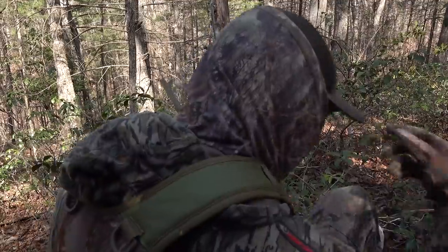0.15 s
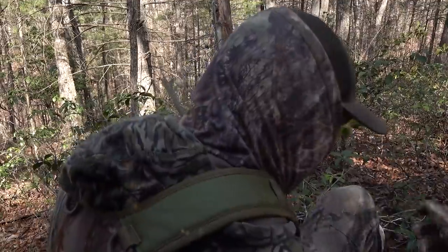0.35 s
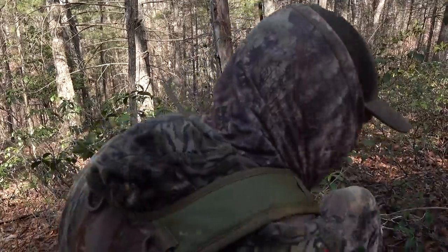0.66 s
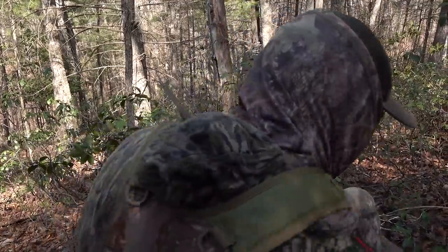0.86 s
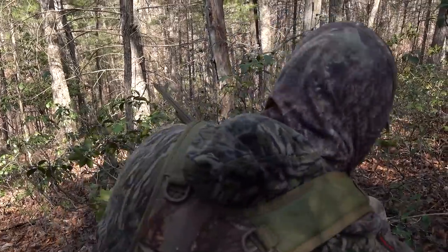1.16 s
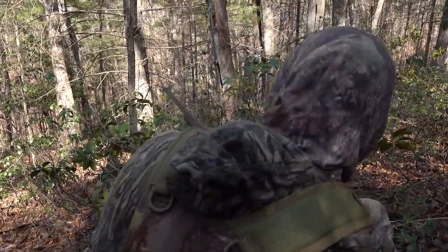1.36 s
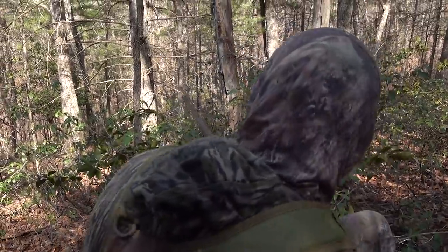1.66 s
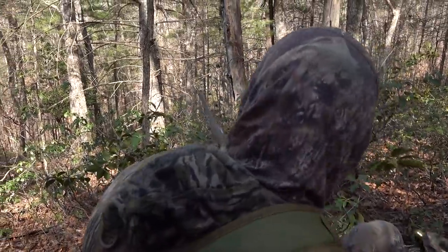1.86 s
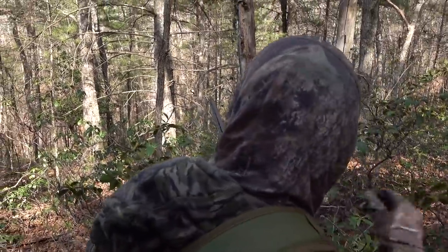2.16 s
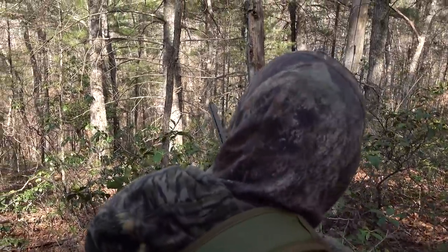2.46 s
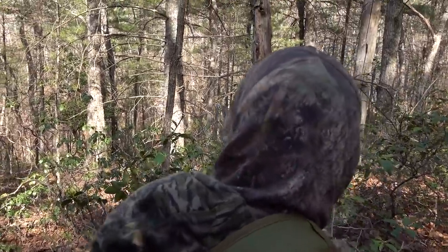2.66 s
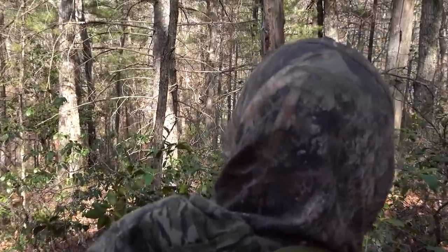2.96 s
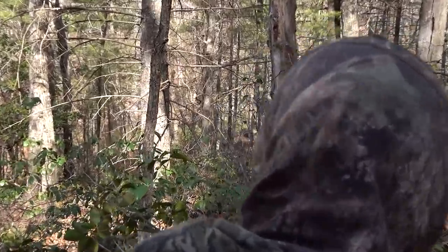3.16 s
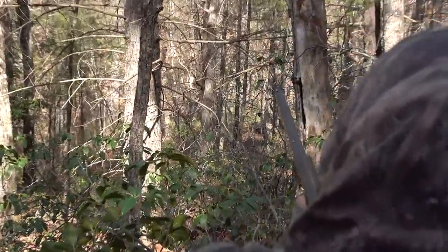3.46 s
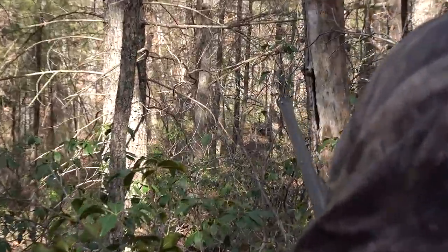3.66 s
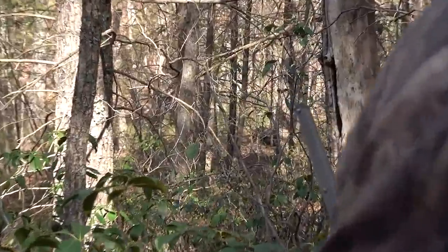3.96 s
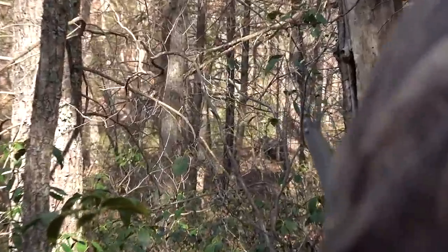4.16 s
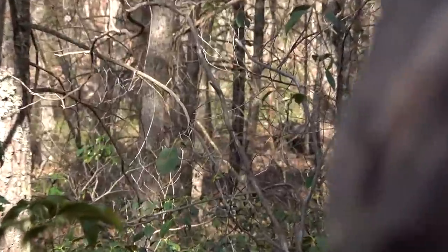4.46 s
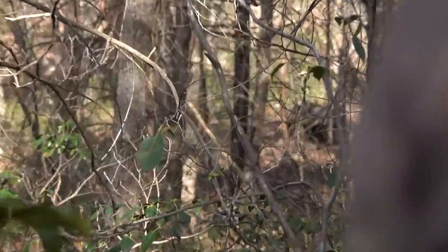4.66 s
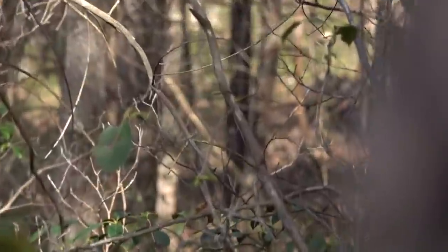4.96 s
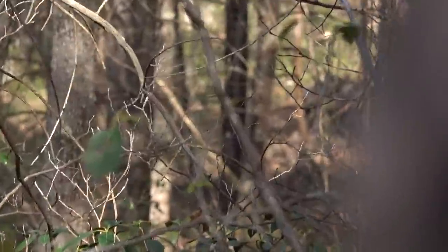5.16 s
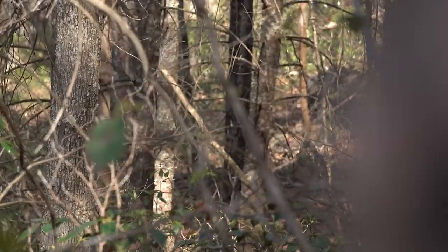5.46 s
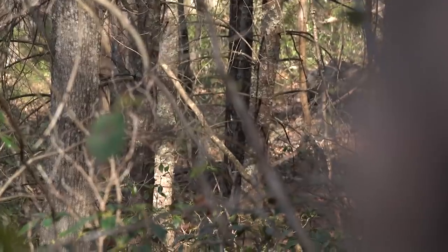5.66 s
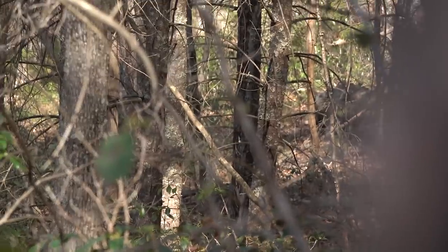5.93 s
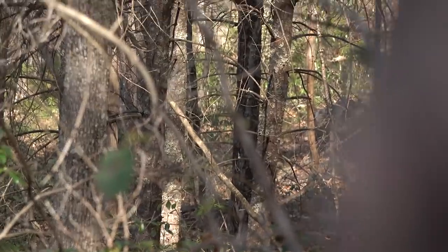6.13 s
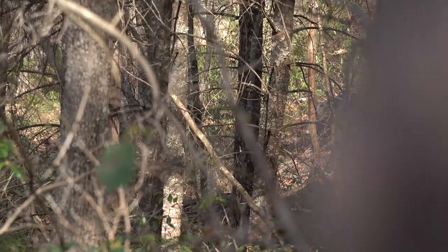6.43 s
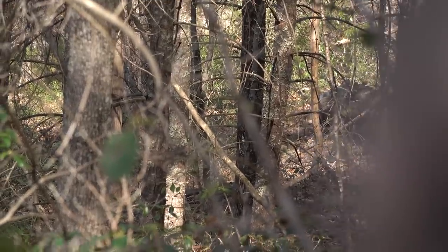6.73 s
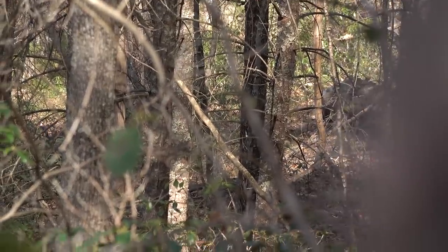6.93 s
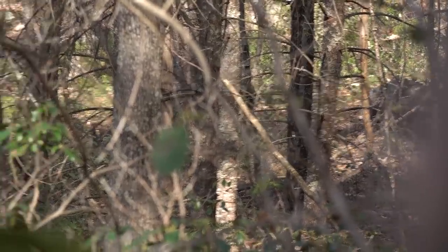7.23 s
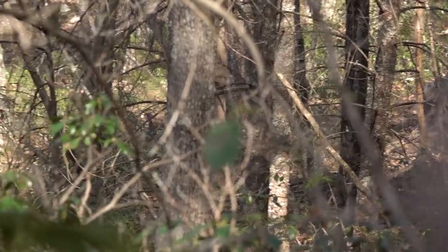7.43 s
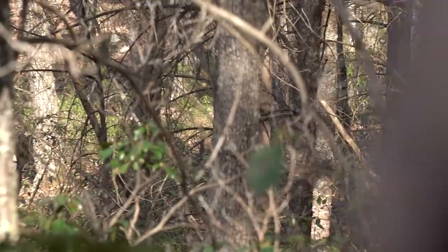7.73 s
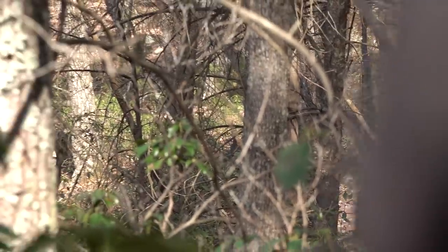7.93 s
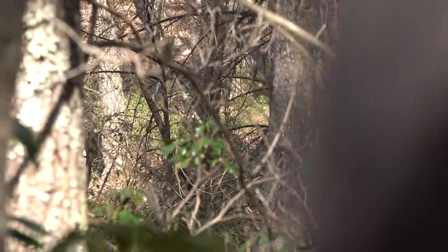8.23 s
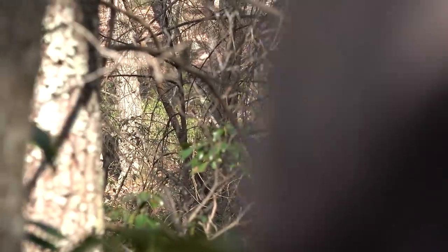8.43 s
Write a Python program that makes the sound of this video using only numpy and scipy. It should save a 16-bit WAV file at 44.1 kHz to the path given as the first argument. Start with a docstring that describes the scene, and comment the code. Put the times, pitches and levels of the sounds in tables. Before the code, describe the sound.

Very close to the microphones, clothes rub and dry leaves hiss. A sharp turkey cluck comes first, then a brief whine sliding upward. After more rustling and faint songbird chips, thirteen buzzing, raspy yelps follow in an even run, with a harsh gritty crunch near the end. Two abrupt clucks close it. A thin woodland echo trails the overloaded, wide stereo sound.

```python
"""Turkey yelps at close range in a wood: a sharp cluck, a rising whine, a run of thirteen yelps, two more clucks.
Clothes and dry leaves rustle and snap, one loud crunch echoes among the trees, a small bird chips far off.
Calls are buzzing partials shaped by a throat spectrum; rustle, snaps and crunch are shaped noise;
chips, drone and knock are sines; the echo is a convolution with decaying noise.
Two clip-on microphones, one a side, each overload into their own limiter; the right one arrives late."""
import sys
import numpy as np
from scipy import signal
from scipy.fft import rfft, irfft, next_fast_len
from scipy.io import wavfile
from scipy.ndimage import map_coordinates

SR = 44100
rng = np.random.default_rng(int(sys.argv[2]) if len(sys.argv) > 2 else 0)


def unload_wav(signal):
    """Save mono or channel-first audio to the path in sys.argv[1] as 16-bit WAV at rate SR, clipped to [-1, 1]."""
    wavfile.write(
        sys.argv[1],
        SR,
        np.round(np.clip(np.atleast_2d(signal).T, -1, 1) * 32767).astype(np.int16),
    )


N = 378819
TIME_S = np.arange(N) / SR

# Yelps. Each row: start in seconds, loud part in seconds, soft tail in seconds, held pitch in Hz,
# left level in dB, right level in dB, seconds until the note breaks, rasp after the break from 0 to 1.
YELPS = [(3.136, 0.046, 0.063, 669.5, -2.5, -5.5, 0.081, 0.1),
         (3.472, 0.078, 0.014, 643.5, -1, 2.5, 0.058, 0.15),
         (3.806, 0.061, 0.041, 681.6, 0.5, 5, 0.053, 0.24),
         (4.115, 0.064, 0.027, 673.7, 0.5, 3.5, 0.038, 0.5),
         (4.449, 0.065, 0.012, 633, -0.5, 4.5, 0.041, 1), (4.778, 0.053, 0.027, 651, -0.5, 3, 0.045, 0.6),
         (5.114, 0.074, 0.023, 692.5, -0.5, 2, 0.044, 0.51),
         (5.452, 0.086, 0.021, 712.7, 0.5, 2, 0.042, 0.97),
         (5.803, 0.0796, 0.017, 674.7, 1, 1, 0.048, 0.56),
         (6.162, 0.058, 0.025, 700.2, -0.5, 4.5, 0.051, 0.74),
         (6.510, 0.064, 0.017, 701.6, 0.5, 3.5, 0.055, 0.68),
         (6.856, 0.047, 0.053, 732, 1, 2.5, 0.033, 0.95), (7.212, 0.068, 0.016, 684, -1, -8, 0.046, 0.41)]
# Clucks. Each row: start in seconds, length in seconds, first pitch in Hz, last pitch in Hz,
# left level in dB, right level in dB, rasp from 0 to 1.
CLUCKS = [(0.129, 0.0378, 525, 790, 1, 4.5, 0.95), (8.224, 0.032, 556.6, 892, 4, 7, 0.9),
          (8.559, 0.035, 516, 844, 0, 13, 0.83)]
# Curve of the whine. Each row: time in seconds, mean pitch in Hz, left level in dB, right level in dB.
WHINE = [(1.06, 530, -30, -38), (1.095, 542.6, -13, -24), (1.14, 592.5, -15, -13), (1.17, 712, -12, -18),
         (1.187, 886, 3.5, 2.5), (1.204, 1164, -8, -5), (1.212, 1200, -42.5, -20)]
# Throat resonances that shape the calls. Each row: frequency in Hz, gain in dB.
THROAT = [(200, -47), (400, -37.5), (690, -29.5), (790, -26), (930, -8.5), (1150, -2), (1350, -0.5),
          (1520, -5), (1700, -11.5), (2100, -20.5), (2800, -42), (3700, -28.5), (4300, -38.5),
          (7000, -51.5), (12000, -61.5)]
# Curve of the loud crunch. Each row: time in seconds, left level in dB, right level in dB.
CRUNCH = [(6.884, -45, -12), (6.893, -27, 5), (6.91, -5, 10.5), (6.917, -28, 9), (6.923, -5, 9),
          (6.935, -39, 12), (6.944, 6, 11), (6.957, 9, 25.5), (6.965, -21, 9.5), (6.985, -55, -10)]
# Spectrum of the crunch. Each row: frequency in Hz, density in dB per Hz.
CRUNCH_SPECTRUM = [(30, -42), (300, -16.5), (900, -5), (2500, -8), (5000, -12), (9000, -10.5),
                   (15500, -15.5)]
# Snaps and scuffs of twigs and cloth. Each row: start in seconds, decay constant in seconds,
# left level in dB, right level in dB (both before SNAP_GAIN_DB), low-pass cutoff in Hz.
SNAPS = [(.155, 0.0091, -29, -3.5, 9000), (.214, 0.005, -28, -8.5, 11600), (.937, 0.0014, -33, -8.5, 14000),
         (.957, 0.0033, -32, -15, 14000), (.978, 0.0033, -31, -13, 12000), (1.096, 0.00335, -14, -25, 2000),
         (2.251, 0.0025, -20, -19, 7000), (2.333, 0.0034, -16, -40, 7050),
         (2.389, 0.0015, -13, -12.5, 5700), (2.720, 0.0047, -21, -12.5, 3760),
         (2.784, 0.0033, -26, -11, 12000), (3.097, 0.0029, -10, -3, 5500), (3.117, 0.003, -7, -21, 1450),
         (3.126, 0.0018, 2, 5.5, 3000), (3.896, 0.0029, -42, -21, 7840), (3.995, 0.0014, -36.5, -10, 2420),
         (4.013, 0.0034, -7, -5, 1900), (4.042, 0.0023, -37, -32, 7000), (4.062, 0.0052, -14, -11.5, 2480),
         (4.599, .003, -36, -23, 10000), (4.678, 0.0021, -39, -10.5, 15100),
         (4.902, 0.0029, -32, -20.5, 10140), (5.088, 0.0015, -5, -0.5, 3900),
         (5.229, 0.0041, -46, -19.5, 12900), (5.348, 0.0013, -34, -14, 12100),
         (5.824, 0.0028, -29, -0.5, 12000), (5.909, 0.0057, -8.5, 3.5, 3520),
         (5.930, 0.0052, -30, -2, 7800), (5.944, 0.0064, -23, -22, 8000), (6.846, 0.0025, -37, -8.5, 7000),
         (6.860, 0.0025, -18, -5.5, 7750)]
# Swishes of cloth and leaves, one a movement, and long faint fidgeting. Each row: start in seconds,
# length in seconds, rub level in dB, hiss level in dB (before HISS_GAIN_DB), left minus right in dB.
SWISHES = [(0.0, 0.16, -26.5, -27.5, -4), (0.128, 0.15, -26.5, -31, -4.5), (0.602, 0.14, -33, -43, 2.5),
           (0.714, 0.28, -27.5, -38.5, -1), (0.59, 11, -43, -52, -4.5), (0.985, 0.18, -23, -30.5, -0.5),
           (1.181, 0.52, -32, -32.5, 2.5), (1.697, 0.39, -32.5, -46, 0.5), (2.185, 0.29, -35.5, -38, -3.5),
           (2.564, 0.42, -31, -42.5, -9), (2.714, 2.3, -39, -59.5, -11.5), (3.039, 0.13, -26.5, -37.5, -8),
           (3.31, 0.24, -36, -43.5, -8.5), (3.716, 0.22, -34, -49, -5), (3.95, 0.23, -38, -50, -13),
           (4.3, 0.045, -37, -68, 11), (4.602, 0.12, -36.5, -48.5, -10), (5.78, 0.26, -36.5, -47, -1),
           (6.272, 0.425, -35.5, -45, -8), (6.753, .18, -30, -38, -10.5), (6.989, 0.16, -60, -40.5, 12.5),
           (7.17, 0.31, -57, -55, 14), (7.36, 0.25, -38.5, -53, -4.5), (7.63, 0.31, -43.5, -54, -6),
           (8.199, 0.49, -31, -45.5, -10)]
# Spectra of the rubbing cloth and of the leaf hiss at each side. Each row: frequency in Hz, density in dB per Hz.
RUB_SPECTRUM = [(30, -18.5), (100, -8.5), (250, -5.5), (450, -1.5), (800, -1.5), (1500, -5), (2500, -13.5),
                (4500, -20), (15000, -72.5)]
HISS_LEFT_SPECTRUM = [(30, -55.5), (800, -2.5), (2200, 2), (4000, -1), (6500, -4.5), (10000, -11),
                      (15500, -19.5)]
HISS_RIGHT_SPECTRUM = [(30, -45), (800, -15.5), (2200, 1), (4500, 2), (7000, -0.5), (11000, -1),
                       (15500, -6)]
# Dull bumps against the microphones. Each row: start in seconds, decay constant in seconds,
# left level in dB, right level in dB, low-pass cutoff in Hz.
BUMPS = [(2.76, 0.043, -30.5, -33, 151), (3.375, 0.0092, -19, -12.5, 447), (4.635, 0.011, -28, -20, 800),
         (4.98, 0.052, -38, -49, 139.4), (5.695, 0.0032, -37, -17.5, 298), (5.91, 0.0059, -40, -2.5, 940),
         (5.93, 0.011, -28, -14.5, 354), (8.12, 0.0059, -21, -28, 800), (8.365, 0.013, -18, -31, 905)]
# Chips of a far songbird. Each row: centre in seconds, level in dB.
CHIPS = [(1.872, -23.5), (1.899, -22), (1.925, -28), (1.982, -30), (2.002, -22), (2.13, -23.5), (2.40, -26),
         (2.73, -34), (3.896, -37), (3.917, -16), (4.014, -21), (4.11, -16), (4.161, -20), (4.214, -24.5),
         (4.643, -31)]
# Spectrum of the echo among the trunks. Each row: frequency in Hz, density in dB per Hz.
WOOD_SPECTRUM = [(30, -22), (400, 11), (1400, 2.5), (3000, 6), (6500, 0.5), (10000, -18), (15500, -10.5)]
# Curve of a faint low drone that sinks at its end. Each row: time in seconds, mean pitch in Hz, level in dB.
DRONE = [(3.6, 180, -53), (3.9, 182.4, -47), (4.85, 180.6, -48.5), (4.94, 164, -47.5), (4.98, 127, -30.5),
         (5.03, 121.7, -58)]

SNAP_GAIN_DB, HISS_GAIN_DB = -0.5, 6.0
SWISH_ATTACK_S, SWISH_RELEASE_S = 0.027, 0.019
TICKS_PER_S, TICK_DECAY_S, TICK_CUTOFF_HZ = 4.5, 0.0011, 10000
TICK_MEAN_DB, TICK_LEFT_MINUS_RIGHT_DB, TICK_SPREAD_DB = -37, -20, 6
KNOCK_START_S, KNOCK_HZ, KNOCK_DECAY_S = 5.925, 381, 0.026
KNOCK_LEFT_DB, KNOCK_RIGHT_DB = -21, -17.5
RIGHT_LATE_S, CUTOFF_HZ = 0.0207, 15700


def from_db(db):
    """Amplitude ratio of a level in dB."""
    return 10 ** (np.asarray(db) / 20)


def rms_one(x):
    """Scale a sound to rms 1."""
    return x / np.sqrt(np.mean(x ** 2) + 1e-20)


def in_time(rows):
    """The columns of a curve over the whole scene, joined by straight lines."""
    times_s, *columns = np.transpose(rows)
    return np.array([np.interp(TIME_S, times_s, column) for column in columns])


def during(rows):
    """1 while a curve lasts, else 0."""
    return (TIME_S > rows[0][0]) & (TIME_S < rows[-1][0])


def at_hz(spectrum, hz):
    """Level in dB of a spectrum at given frequencies, linear over log frequency."""
    points_hz, points_db = np.array(spectrum).T
    return np.interp(np.log(hz), np.log(points_hz), points_db)


def colour(x, spectrum):
    """Filter a sound by a spectrum and scale it to rms 1."""
    size = next_fast_len(len(x))
    bins_hz = np.linspace(1, SR / 2, size // 2 + 1)
    shaped = rfft(x, size) * from_db(at_hz(spectrum, bins_hz))
    return rms_one(irfft(shaped, size)[:len(x)])


def wander(rate_hz, size):
    """Smooth random curve of spread about 1 through rate_hz new values a second."""
    knots = rng.standard_normal(size // 40 + 4)
    return map_coordinates(knots, [np.arange(size) * rate_hz / SR], order=2, mode="mirror")


def step(x):
    """Smooth step from 0 to 1 around x = 0."""
    return .5 + .5 * np.tanh(x)


def panned(left_minus_right_db):
    """Level offsets of the left and right microphone in dB."""
    return np.array([left_minus_right_db, -left_minus_right_db]) / 2


def add(out, start_s, sound, levels_db):
    """Mix a sound in at a time, with a level for each microphone."""
    at = round(start_s * SR)
    part = (from_db(levels_db)[:, None] * sound)[:, :N - at]
    out[:, at:at + part.shape[1]] += part


def reed(pitch_hz, rasp, opening, jitter=0.0074, leap_log=0.32, leap_rate_hz=170, flutter_db=2.0,
         air=0.051, rasp_air=0.43, open_db=23.5, hollow_db=12.0, gulp_db=7.5):
    """A membrane buzzes through the throat, whose opening trades the overtones for the fundamental.
    In a rasp the note keeps leaping to a higher, hollow register, flutters more and hisses with air."""
    size = len(pitch_hz)
    leaping = rasp * step(2 * wander(leap_rate_hz, size) - .5)
    pitch_hz = pitch_hz * np.exp(jitter * wander(391, size) + leap_log * leaping)
    phase = 2 * np.pi * np.cumsum(pitch_hz) / SR
    fundamental_db = at_hz(THROAT, pitch_hz) + open_db * opening + gulp_db * leaping
    gains = [np.minimum(from_db(fundamental_db), 1)]
    for k in range(2, 9):
        gains.append(from_db(at_hz(THROAT, k * pitch_hz) - hollow_db * opening))
    heard = []
    for side in range(2):   # each microphone hears the partials with other phases
        tone = 0
        for k, gain in enumerate(gains, 1):
            tone = tone + gain * np.sin(k * phase + rng.uniform(0, 2 * np.pi))
        flutter = from_db(flutter_db * (rasp + 1.42) * wander(126.3, size))
        breath = colour(rng.standard_normal(size), THROAT)
        heard.append(tone * flutter + (air + rasp_air * rasp) * breath)
    return np.array(heard)


def yelps(scoop=0.82, scoop_s=0.004, end_rise=0.179, rise_s=0.01624, tail_db=-15.0, fall_s=0.0047,
          left_attack_s=0.0022, right_attack_s=0.0067, push_db=17.0, push_s=0.0042,
          tail_leap=0.26, tail_rasp=0.536):
    """Each drops from a hard squeak to a held note, may break into a rasp, and falls into a soft, hollow tail."""
    out = np.zeros((2, N))
    attack_s = np.array([[left_attack_s], [right_attack_s]])
    for start_s, loud_s, tail_s, hz, left_db, right_db, break_s, rasp in YELPS:
        t = TIME_S[:int((loud_s + tail_s + .02) * SR)]
        held = step((loud_s - t) / fall_s)
        opening = np.clip((t - loud_s) / tail_s, 0, 1)
        # a broken note slides down from its high register
        slide = tail_leap * rasp * step((t - loud_s - .003) / 0.00045) * (1 - opening)
        squeak = scoop * np.exp(-t / scoop_s)
        rise = end_rise * step((t - loud_s) / rise_s)
        pitch_hz = hz * (1 + squeak + rise + slide)
        attack = step(t / attack_s - 2) * from_db(push_db * np.exp(-t / push_s))
        ending = step((loud_s + tail_s - t) / 0.0033)
        effort = attack * (held + from_db(tail_db) * (1 - held)) * ending
        rasp_left = held + tail_rasp * (1 - held) * (1 - opening)
        broken = rasp * step((t - break_s) / 0.0049) * rasp_left
        throat_opening = opening ** 0.53 * min(.3 + 2.9 * rasp, 1)
        add(out, start_s, effort * reed(pitch_hz, broken, throat_opening), [left_db, right_db])
    return out


def clucks(edge_s=0.0023, grit=0.68, lurch=0.144, gape=0.4):
    """A cluck starts as an open, gritty, lurching burst and clears into an upward sweep."""
    out = np.zeros((2, N))
    for start_s, length_s, first_hz, last_hz, left_db, right_db, rasp in CLUCKS:
        t = TIME_S[:int((length_s + .01) * SR)]
        along = np.minimum(t / length_s, 1)
        effort = step(2 * (t - edge_s) / edge_s) * step((length_s - t) / edge_s)
        rough = rasp * step((.7 - along) / 0.12)
        sweep_hz = first_hz + (last_hz - first_hz) * along ** 1.543
        pitch_hz = sweep_hz * np.exp(lurch * rough * wander(247.3, len(t)))
        noise = colour(rng.standard_normal(len(t)), THROAT)
        voice = reed(pitch_hz, rough, gape * rough) + grit * rough * noise
        add(out, start_s, effort * voice, [left_db, right_db])
    return out


def whine(jitter=0.0362):
    """A wavering note slides upward; its second harmonic, the hoarseness, thins as it climbs."""
    pitch_hz, *levels_db = in_time(WHINE)
    phase = 2 * np.pi * np.cumsum(pitch_hz * (1 + jitter * wander(300, N))) / SR
    hoarse = .4 * (pitch_hz.min() / pitch_hz) ** 3 * (1 + .7 * wander(300, N))
    tone = np.sin(phase) + hoarse * np.sin(2 * phase)
    return during(WHINE) * tone * from_db(np.array(levels_db) + 2 * wander(150, N))


def friction(spectrum, grain_db, patchy_db):
    """Rubbing: dense tiny slips of uneven size that come in clumps."""
    unevenness_db = grain_db * wander(900, N) + patchy_db * wander(45, N)
    return colour(rng.standard_normal(N) * from_db(unevenness_db), spectrum)


def crunch(left_cutoff_hz=4500):
    """A hard, gritty scrape that peaks in a crack near its end; duller at the left microphone."""
    left, right = [friction(CRUNCH_SPECTRUM, grain_db=2.5, patchy_db=1.5) for side in range(2)]
    low_pass = signal.butter(1, left_cutoff_hz, fs=SR, output="sos")
    left = rms_one(signal.sosfilt(low_pass, left))
    return during(CRUNCH) * from_db(in_time(CRUNCH)) * np.array([left, right])


def bursts(rows, low_hz):
    """Short contacts: sudden bursts of slips that die away, with little bass below low_hz."""
    out = np.zeros((2, N))
    t = TIME_S[:SR // 5]
    high_pass = signal.butter(1, low_hz, "high", fs=SR, output="sos")
    for start_s, decay_s, left_db, right_db, cutoff_hz in rows:
        low_pass = signal.butter(2, min(cutoff_hz, .45 * SR), fs=SR, output="sos")
        noise = signal.sosfilt(low_pass, rng.standard_normal((2, len(t))))
        noise = signal.sosfilt(high_pass, noise)
        add(out, start_s, rms_one(noise) * np.exp(-t / decay_s), [left_db, right_db])
    return out


def snaps():
    """Twigs and cloth snap and scuff in short noise bursts."""
    return from_db(SNAP_GAIN_DB) * bursts(SNAPS, low_hz=500)


def rustle(rest_rub_db=-42.0, rest_hiss_db=-54.5):
    """Cloth rubs dully and leaves hiss, faintly all the time; each movement's swish swells, holds and fades."""
    rub_power, hiss_power = from_db(rest_rub_db) ** 2, from_db(rest_hiss_db) ** 2
    for start_s, length_s, rub_db, hiss_db, left_minus_right_db in SWISHES:
        swell = step((TIME_S - start_s) / SWISH_ATTACK_S)
        fade = step((start_s + length_s - TIME_S) / SWISH_RELEASE_S)
        power = swell * fade * from_db(panned(left_minus_right_db))[:, None] ** 2
        rub_power = rub_power + power * from_db(rub_db) ** 2
        hiss_power = hiss_power + power * from_db(hiss_db) ** 2
    rub = [friction(RUB_SPECTRUM, grain_db=2.5, patchy_db=2.5) for side in range(2)]
    hiss = [friction(HISS_LEFT_SPECTRUM, grain_db=1.5, patchy_db=-0.05),
            friction(HISS_RIGHT_SPECTRUM, grain_db=2.5, patchy_db=4.0)]
    return np.sqrt(rub_power) * rub + from_db(HISS_GAIN_DB) * np.sqrt(hiss_power) * hiss


def bumps():
    """Dull noise bursts: contacts against the microphones."""
    return bursts(BUMPS, low_hz=172)


def knock():
    """A hollow knock: one low mode rings briefly."""
    out, t = np.zeros((2, N)), TIME_S[:SR // 3]
    ring = np.sin(2 * np.pi * KNOCK_HZ * t) * np.exp(-t / KNOCK_DECAY_S)
    add(out, KNOCK_START_S, ring, [KNOCK_LEFT_DB, KNOCK_RIGHT_DB])
    return out


def ticks():
    """Leaves and small twigs tick faintly at random moments."""
    count = round(TICKS_PER_S * N / SR)
    times_s = rng.uniform(0, TIME_S[-1], count)
    spread_db = TICK_SPREAD_DB * rng.standard_normal((count, 2))
    levels_db = TICK_MEAN_DB + panned(TICK_LEFT_MINUS_RIGHT_DB) + spread_db
    rows = [(start_s, TICK_DECAY_S, left_db, right_db, TICK_CUTOFF_HZ)
            for start_s, (left_db, right_db) in zip(times_s, levels_db)]
    return bursts(rows, low_hz=500)


def wood(near, t60_s=0.93, build_s=0.037, echo_db=-34):
    """Trunks scatter a thin echo of the left near sound that builds up and dies away."""
    t = TIME_S[:SR]
    shape = (1 - np.exp(-t / build_s)) * from_db(-60 * t / t60_s)
    heard = []
    for side in range(2):
        echo = rms_one(colour(rng.standard_normal(SR), WOOD_SPECTRUM) * shape) / np.sqrt(SR)   # unit energy
        heard.append(signal.fftconvolve(near[0], echo)[:N])
    return from_db(echo_db) * np.array(heard)


def songbird(top_hz=5200, bottom_hz=4400, length_s=.009, spread=0.093, scratch=0.071):
    """Each chip is a quick, scratchy downward whistle around its own random pitch."""
    out, t = np.zeros((2, N)), TIME_S[:int(length_s * SR)]
    for centre_s, level_db in CHIPS:
        detune = 1 + spread * rng.standard_normal() + scratch * wander(930, len(t))
        pitch_hz = np.geomspace(top_hz, bottom_hz, len(t)) * detune
        chip = np.sin(2 * np.pi * np.cumsum(pitch_hz) / SR) * np.hanning(len(t))
        add(out, centre_s - length_s / 2, chip, [level_db, level_db])
    return out


def drone(waver=0.0068):
    """A soft, almost pure low tone."""
    pitch_hz, level_db = in_time(DRONE)
    phase = 2 * np.pi * np.cumsum(pitch_hz * (1 + waver * wander(6.3, N))) / SR
    return during(DRONE) * from_db(level_db) * np.sin(phase)


def scene():
    """Near sounds with their echo among the trees, over the rustle and the far sounds."""
    near = yelps() + clucks() + whine() + crunch() + snaps()
    handling = rustle() + bumps() + knock() + ticks()
    return near + wood(near) + handling + songbird() + drone()


def limiter(x, threshold_db=6.5, release_db_per_s=115.0, attack_s=.007):
    """The gain ducks under loud peaks and creeps back."""
    over_db = np.maximum(20 * np.log10(np.abs(x) + 1e-9) - threshold_db, 0)
    release_db = release_db_per_s * TIME_S
    held_db = np.maximum.accumulate(over_db + release_db, axis=1) - release_db
    pole = np.exp(-1 / (attack_s * SR))
    reduction_db = signal.lfilter([1 - pole], [1, -pole], held_db)
    return x * from_db(-reduction_db)


def record(dry):
    """Each side is limited and soft-clips what slips through; the right side runs late; the top is cut."""
    top, hardness = 1.06, 8
    x = limiter(dry)
    x = x / (1 + np.abs(x / top) ** hardness) ** (1 / hardness)
    late = round(RIGHT_LATE_S * SR)
    right = np.pad(x[1], (late, 0), mode="reflect")[:N]
    low_pass = signal.ellip(10, .1, 70, CUTOFF_HZ, fs=SR, output="sos")
    return signal.sosfilt(low_pass, np.array([x[0], right]))


dry = scene()
out = record(dry)
unload_wav(out)
```